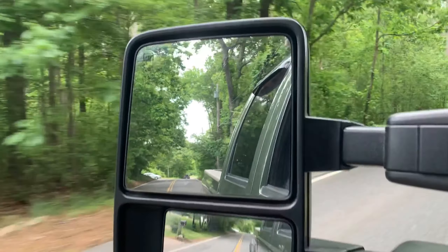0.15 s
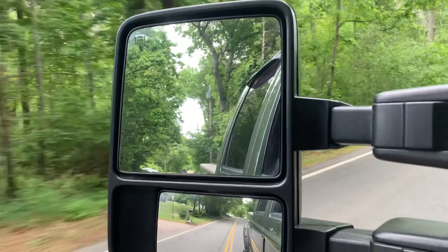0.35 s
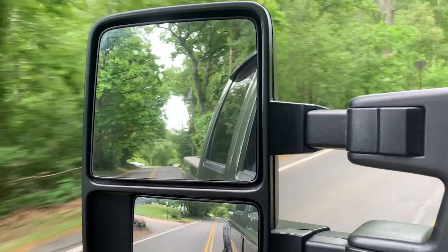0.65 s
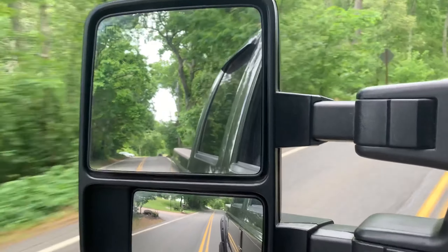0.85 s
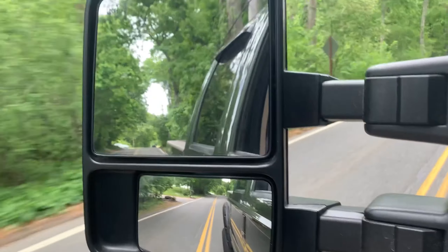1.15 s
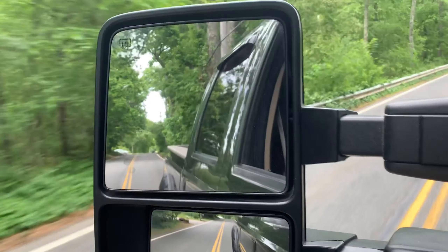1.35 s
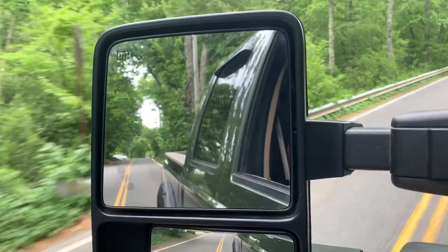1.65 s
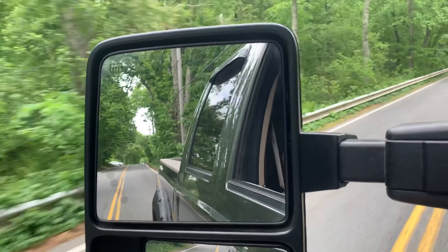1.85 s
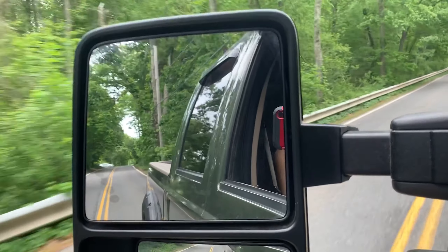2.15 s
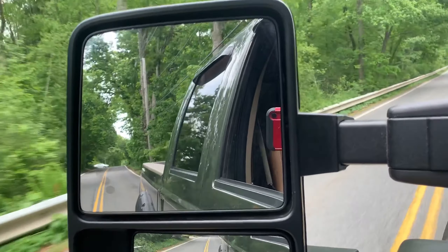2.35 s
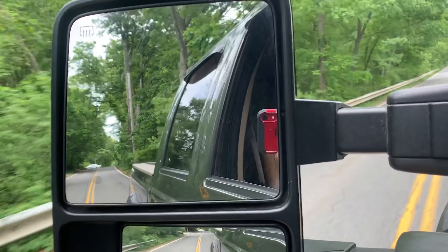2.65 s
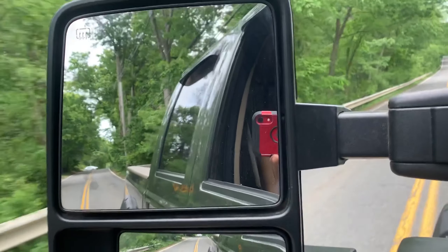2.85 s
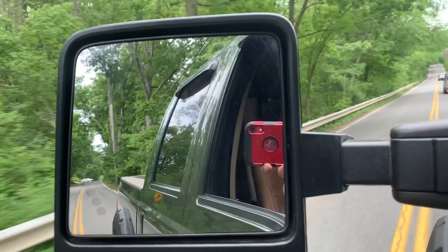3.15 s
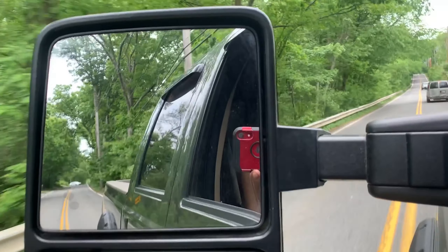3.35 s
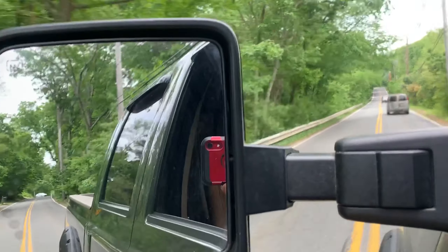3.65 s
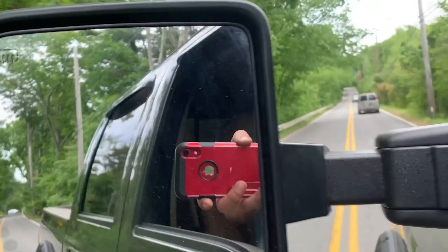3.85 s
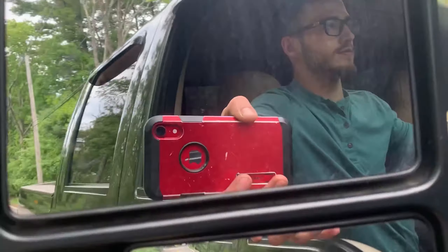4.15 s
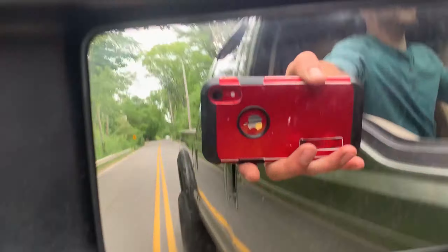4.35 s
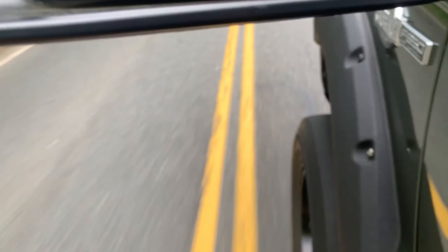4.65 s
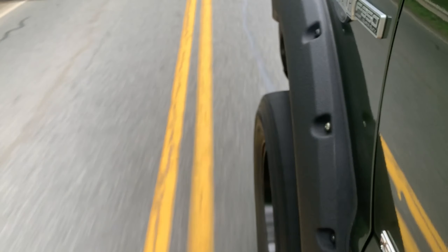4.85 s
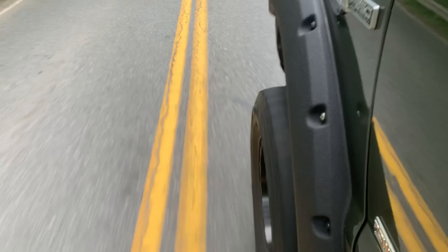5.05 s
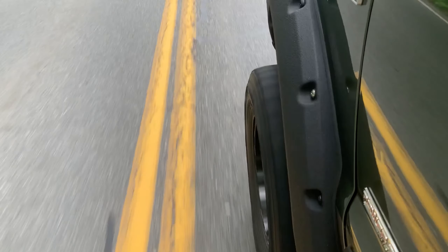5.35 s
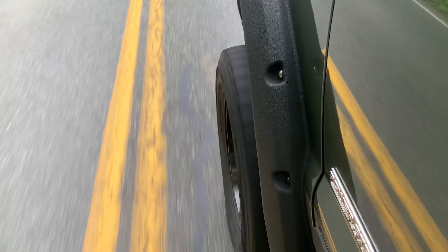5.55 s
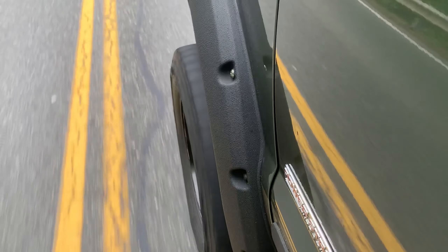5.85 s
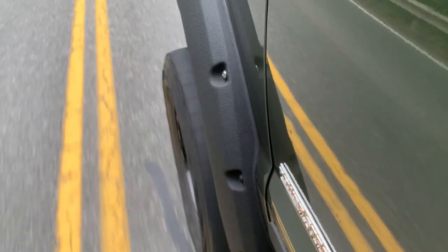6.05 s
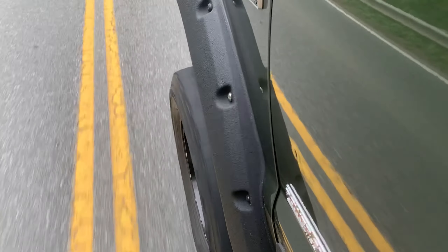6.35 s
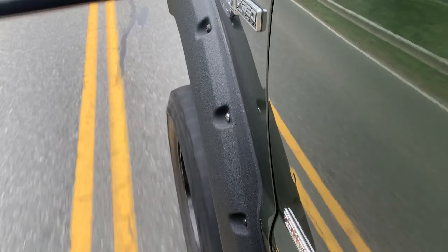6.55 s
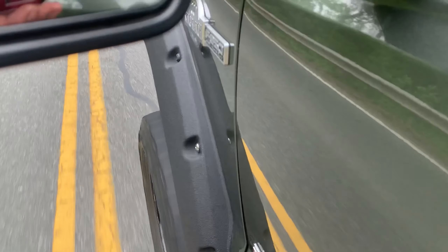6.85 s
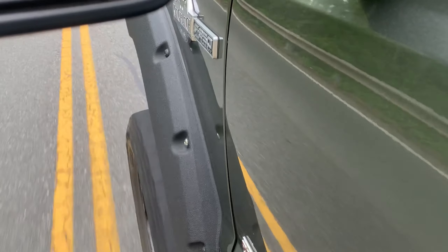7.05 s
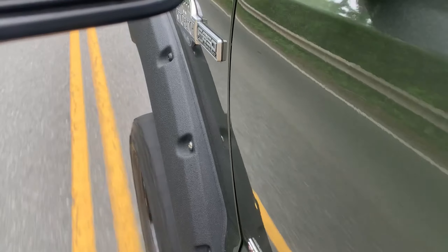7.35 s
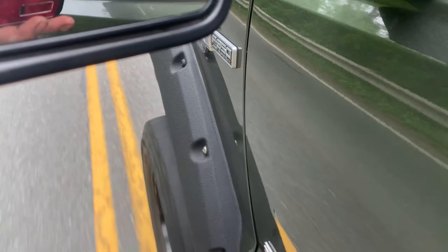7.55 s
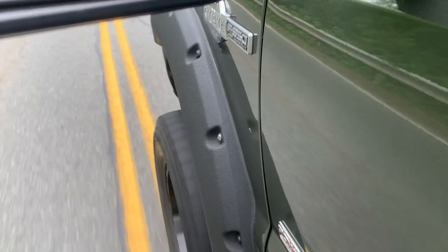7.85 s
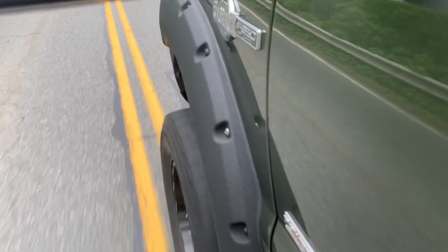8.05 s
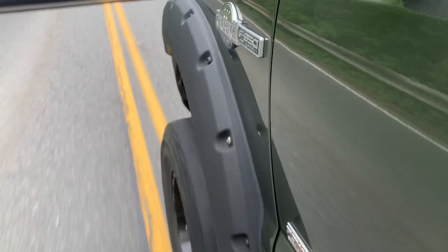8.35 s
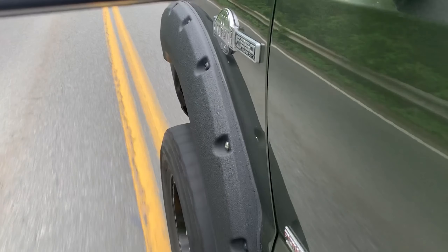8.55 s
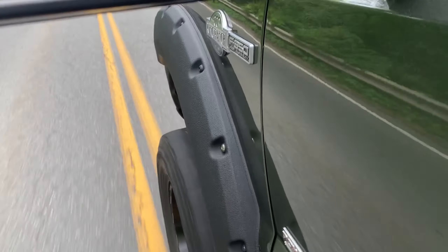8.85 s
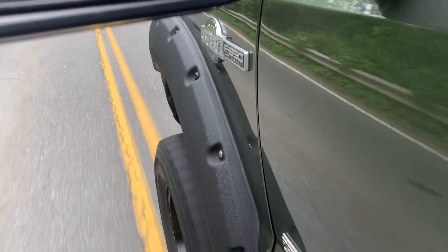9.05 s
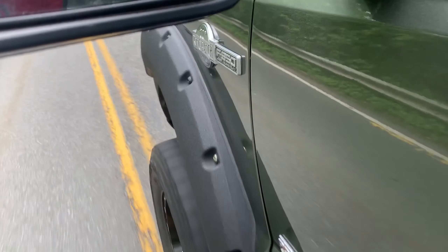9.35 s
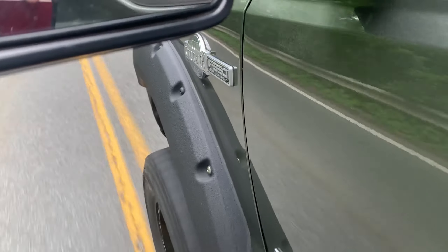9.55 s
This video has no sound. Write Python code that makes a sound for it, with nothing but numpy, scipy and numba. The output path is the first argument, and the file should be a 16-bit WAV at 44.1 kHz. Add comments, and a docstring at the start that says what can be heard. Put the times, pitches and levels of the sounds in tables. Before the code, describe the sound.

Strong wind hits a phone microphone held out of a moving truck's window, rumbling and thumping with sharp snaps and papery crackle. Beneath it, tyres roar on the road, a diesel engine drones and a faint high turbo whistle rises, then falls away. The sound is hollow at first and opens up about four seconds in with a brief hiss. The road noise then recedes while the gusts keep pounding.

```python
"""Wind thumps and rumbles on a phone held out of the window of an accelerating diesel truck.
Eddies hit the two microphone ports point-blank: large ones rumble, small ones rasp, snap and crackle.
Farther off, tyres roar on the country road, the engine drones and the turbocharger whistles.
The sound is hollow by the window frame and opens up about 4 s in, out in the airstream.
The phone keeps the bass mono and takes the treble mostly from one port, late on one side."""
import sys
import numpy as np
from scipy import signal
from scipy.fft import rfft, irfft, next_fast_len
from scipy.io import wavfile
from scipy.ndimage import uniform_filter1d
from numba import njit

SR = 44100
rng = np.random.default_rng(int(sys.argv[2]) if len(sys.argv) > 2 else 0)


def to_wav(sig):
    """Store sig (one row per channel, or 1-D mono) as 16-bit WAV at the path in sys.argv[1].

    Samples outside -1..1 are clipped; the rate is SR.
    """
    pcm = np.clip(np.atleast_2d(sig), -1, 1) * 32767
    pcm = np.round(pcm).astype(np.int16)
    wavfile.write(sys.argv[1], SR, pcm.T)  # frames by channels


N = 427769
SIZE = next_fast_len(N)
TIME_S = np.arange(N) / SR
HZ = np.maximum(np.arange(SIZE // 2 + 1) * SR / SIZE, 1)

# Tyre and engine roar at the window, in the 880-4000 Hz band: time_s, level_db
ROAR_LEVEL = [(0, -42), (.3, -41.5), (.6, -41.5), (1.08, -39), (1.54, -36.5), (2.89, -35), (3.7, -33),
              (4, -34), (4.8, -30), (6.1, -32.5), (6.9, -40), (7.67, -37.5), (8.8, -45.5), (9.7, -54)]
# Spectrum of that roar: frequency_hz, gain_db
ROAR_COLOUR = [(24, -37), (40, 1), (120, -3.5), (260, -16), (550, -22.5), (800, -15), (980, -18.5),
               (1200, -19.5), (1500, -31.5), (2050, -31.5), (2400, -31.5), (2750, -30.5), (3200, -32),
               (3450, -49), (4200, -39.5), (7000, -53), (11000, -60), (15800, -82)]
# Partials of the engine hum: pitch_hz, level_db
ENGINE_PARTIALS = [(65, -34), (157, -35), (237, -50.5), (291, -53)]
# Turbocharger: time_s, pitch_hz, rush_db, tone_db
TURBO_WHISTLE = [(0, 7660, -64, -75), (.5, 7800, -61, -66), (1, 8500, -60, -76), (1.5, 9190, -49, -52),
                 (2, 10000, -45.5, -50), (2.5, 10110, -44.5, -52), (3, 10230, -43.5, -46),
                 (3.5, 10250, -43.5, -47), (3.75, 9960, -47.5, -58), (4.05, 9350, -47, -49),
                 (4.25, 9220, -40, -49), (4.5, 9110, -65, -44.5), (5.1, 9070, -59, -40.5),
                 (5.3, 8960, -49, -48), (5.5, 8730, -49, -51), (5.8, 8200, -53, -72), (7, 8230, -61, -85)]
# Hollow knocks among the eddies: start_s, level_db, pitch_hz
WIND_KNOCKS = [(0.803, -13, 464), (0.885, -23, 305), (1.609, -28, 312), (2.011, -21, 380),
               (2.248, -20, 388), (3.283, -13, 493), (3.751, -11, 328), (4.19, -7, 600), (4.799, -6, 330),
               (5.769, -14, 500), (5.849, -14, 450), (6.463, -3, 479), (7.343, -5.5, 301), (7.405, -8, 300),
               (7.427, -8, 300), (7.601, -14, 406), (8.706, -12, 320), (8.985, -7, 415)]
# The hardest eddies bursting on a port: start_s, snap_db, thump_db, tick_db
HARD_EDDIES = [(0.076, -21, -27, -72), (0.652, -12.5, -10, -64), (0.803, -40, -28, -66),
               (0.886, -14, -19.5, -60), (1.057, -36, -19, -66), (1.123, -15, -7, -65),
               (1.154, -18, -19, -65), (1.174, -14, -21, -62), (1.21, -15, -36, -61), (1.305, -9, -11, -42),
               (1.364, -13, -18, -39), (1.442, -20, -18, -62), (1.518, -18, -22, -62),
               (1.604, -12, -20, -56), (1.664, -15, -34, -60), (1.764, -13, -18, -57),
               (1.97, -13, -34, -48), (2.121, -16, -16, -54), (2.144, -19, -28, -56),
               (2.182, -12, -23, -51), (2.261, -18, -32, -52), (2.306, -13, -19, -58),
               (2.335, -14, -26, -58), (2.367, -11, -18, -54), (2.409, -22, -15, -62),
               (2.47, -17, -15, -53), (2.518, -9, -30, -48), (2.53, -4.5, -32, -48), (2.553, -13, -24, -52),
               (2.607, -9, -9, -38), (2.629, -20, -15, -58), (2.657, -12, -18, -46), (2.708, -13, -12, -52),
               (2.762, -22, -12, -53), (3.204, -11.5, -7, -37), (3.28, -11, -10, -30),
               (3.363, -20, -5, -52), (3.749, -18, -14, -47), (3.789, -10, -22, -38), (3.812, -8, -8, -33),
               (4.079, -14, -24, -38), (4.095, -15, -24, -38), (4.149, -5, -18, -46), (4.19, -14, -25, -33),
               (4.286, 1, -4, -34), (4.413, 1, -14, -64), (4.495, -4, -18, -54), (4.799, -1, -7, -61.5),
               (5.009, -25, -9, -57), (5.235, -2, -11, -52), (5.329, -10, -10, -52), (5.375, -5, -7, -56),
               (5.468, -4, -7, -57), (5.77, -2, -11, -60), (5.853, -7, -14, -55), (6.175, -6, -24, -45),
               (6.463, -8, -7, -58), (7.078, -2.5, -8, -48), (7.125, -6.5, -25, -40), (7.163, -6, -19, -61),
               (7.223, -13, -13, -52), (7.259, -16, -8, -51), (7.367, -10, -26, -56),
               (7.426, -9.5, -13, -50), (7.539, -6, -10, -48), (7.602, -12, -14, -71),
               (7.876, -4.5, -15, -37), (8.228, -12, -18, -44), (8.345, 1, -38, -53),
               (8.544, -15, -21, -50), (8.764, -8, -12, -38), (8.784, -11, -27, -48), (8.917, -5, -20, -51),
               (8.947, 0, -14, -46), (9.005, -6, -23, -52), (9.037, -13, -26, -48), (9.087, -9, -6.5, -45),
               (9.134, -7, -4, -46), (9.188, -3, -28, -55), (9.265, -2, -23, -43), (9.338, -5, -20, -42),
               (9.494, -6, -5, -48)]
# Spectra that then shape the three parts of a burst: frequency_hz, gain_db
SNAP_COLOUR = [(250, -35), (800, 5), (1500, 3), (3000, -9.5), (4300, -9.5), (5400, -30), (9000, -42)]
THUMP_COLOUR = [(30, 39.5), (100, 44), (300, 37.5), (600, 29), (1000, 8), (3000, -27)]
TICK_COLOUR = [(3000, -24), (4500, -6), (6500, 2), (11000, 7.5), (15800, -9)]
# Wind bands, large eddies to small (rumble, flutter, flap, rasp, crackle): low_hz, high_hz
EDDY_BANDS = [(30, 130), (150, 350), (400, 900), (1500, 5000), (11500, 15500)]
# Spectrum of the turbulence: frequency_hz, gain_db
EDDY_COLOUR = [(20, -96), (43, 1), (88, 0.5), (207, -5.5), (1050, -25), (2200, -32), (4200, -41),
               (5500, -48), (7800, -46.5), (11000, -57.5), (15800, -59.5)]
# Mean wind on the ports: time_s, rumble_db, flutter_db, flap_db, rasp_db, crackle_db
MEAN_WIND = [(0, -10.5, -36, -40, -41, -70), (0.15, -20, -46, -48, -59, -82),
             (0.25, -39, -43, -52, -51, -80), (0.6, -25.5, -41, -42.5, -53, -78),
             (1.1, -23, -26, -46, -48, -68), (1.5, -12.5, -26, -49, -43.5, -69),
             (2.2, -13.5, -20, -38, -38.5, -69), (2.7, -8.5, -17, -30.5, -39, -59.5),
             (3.2, -9.5, -12.5, -20, -32, -59), (3.7, -10.5, -11, -20.5, -35, -56),
             (3.95, -11, -13.5, -17, -26.5, -67.5), (4.5, -14.5, -25.5, -29, -36, -66),
             (5, -9.5, -20, -25, -31, -62), (5.8, -16.5, -21, -24, -32, -71.5),
             (6.5, -15, -21.5, -20, -30, -68.5), (7.5, -21.5, -21.5, -26, -35.5, -84.5),
             (8.2, -9.5, -18, -26.5, -32.5, -70.5), (9, -11.5, -15, -18.5, -26.5, -65),
             (9.7, -11.5, -18, -28, -33, -67)]
# Gusts, added to the mean wind: middle_s, length_s, rumble_db, middle_bands_db, crackle_db
WIND_GUSTS = [(0.582, 0.052, 14, 1, 2), (0.665, 0.075, 11, 18, -7), (0.871, 0.14, 15.5, 4, 0),
              (1.073, 0.071, 18.5, 7.5, -7), (1.126, 0.042, 12, 12, -10), (1.261, 0.045, 17.5, 1, 0),
              (1.308, 0.046, 19, 10, 6), (1.389, 0.073, 6, 6.5, 2), (1.454, 0.094, -5, 6, -8),
              (1.604, 0.1, 10, 6, 2), (1.694, .05, 9, 3, 2), (1.81, 0.054, 10, 1.5, 0),
              (1.871, 0.055, 12, 3.5, 5), (2.013, 0.041, 0, 5, -6), (2.12, 0.17, 7, 1.5, 2),
              (2.25, 0.042, 9, 5.5, -2), (2.302, 0.034, 5, -1, 2), (2.437, 0.076, 3, -3, 0),
              (2.508, 0.1, 6, 7.5, 6), (2.554, 0.043, -8, -1, 2), (2.63, 0.084, -7, 3.5, 12),
              (2.703, 0.052, -2, -5, -8), (2.93, 0.1, 9, 0.5, 3), (3.823, 0.054, -8, 5.5, -4),
              (3.954, 0.18, 0, 2, 12), (4.09, 0.11, -1, -2.5, 12), (4.15, 0.1, -2, 4, 15),
              (4.252, 0.22, -7, 8.5, 15), (4.293, .04, -4, 2, 6), (4.505, 0.026, 14, 6.5, 11),
              (4.656, 0.11, -5, 2, 8), (4.715, 0.76, 0, 8, 2.5), (4.912, 0.085, -3, 4.5, -5),
              (5.141, 0.27, 1, 6.5, 2), (5.516, 0.21, 0.5, 4, 4), (5.644, 0.21, -2, 6.5, 2),
              (5.787, 0.047, 7, 1, 11), (6.156, 0.15, -1, 3.5, 5), (6.541, 0.039, 11.5, 2, 6),
              (6.753, 0.19, 8, 3, 15), (7.092, 0.24, 5, 5, 23), (7.262, 0.046, 1, 3.5, 27),
              (7.4, 0.42, 5, 4, 10), (7.9, 0.062, 0, 0, 16), (8.034, 0.045, -6, 4, 17),
              (8.146, 0.059, -1.5, 7, 13), (8.224, 0.097, -6, 7.5, 13), (8.396, 0.21, -4, 7, 15),
              (8.538, 0.029, 0, -1.5, 25), (8.672, 0.077, 7, -1.5, -6), (8.993, 0.23, 3.5, -2, 6.5),
              (9.078, 0.06, 6, -6.5, 15), (9.187, 0.037, -1, 5, 21), (9.246, 0.063, -1, 6.5, 17),
              (9.493, 0.12, -7, 5, 10), (9.566, 0.034, -14, 2, 15)]
# Lulls: middle_s, length_s, drop_db
WIND_LULLS = [(0.534, 0.077, 8), (0.79, 0.065, 0), (0.994, 0.21, 3.5), (1.208, 0.11, 6), (1.472, 0.042, -1),
              (1.564, .045, 10), (1.756, 0.07, 3), (1.851, 0.052, 23), (1.923, 0.045, 0), (2.05, .05, 2),
              (2.22, 0.032, 9), (2.37, 0.049, 10), (2.506, 0.045, 10), (2.67, 0.038, 2), (2.764, .045, 2),
              (3.46, 0.65, 4.5), (4.33, 0.071, 3.5), (4.468, 0.057, 2.5), (5.275, 0.14, 3),
              (5.594, 0.073, 6), (6.396, 0.21, 6), (6.614, 0.12, 8), (6.882, 0.6, 5.5), (7.166, 0.11, 4.5),
              (7.51, 0.035, 8), (7.782, 0.065, 6), (8.28, 0.097, 1.5), (8.58, 0.42, 2.5), (8.884, .08, 3.5),
              (9.196, 0.33, 7), (9.407, 0.064, 0), (9.595, 0.075, 5.5)]
# Hollow tone with the microphone by the window frame: frequency_hz, gain_db
FRAME_COLOUR = [(450, 0.5), (700, -4.5), (950, -7), (1150, -1), (1400, 0.5), (1750, -1), (2400, -4.5),
                (2950, -4), (3450, -3), (4300, -4), (5500, -1.5), (7000, -1)]
# Edge below which the phone's channels are alike: time_s, edge_hz
MONO_EDGE = [(0, 745), (1.6, 327), (3.8, 480), (4.1, 950), (4.6, 1130), (5.8, 1030), (9.7, 810)]


def undb(db):
    return 10 ** (np.asarray(db) / 20)


def unit(x):
    return x / np.sqrt(np.mean(x ** 2))


def curves(table):
    """Columns of a timed table, one value per sample."""
    time_s, *columns = np.transpose(table)
    return [np.interp(TIME_S, time_s, column) for column in columns]


def colour(points):
    """Gain per frequency bin from (frequency_hz, gain_db) points."""
    hz, db = np.transpose(points)
    return undb(np.interp(np.log(HZ), np.log(hz), db))


def band_db(gain, low_hz, high_hz):
    """Level that white noise keeps between two edges after a colour."""
    return 10 * np.log10(np.sum(gain[(HZ > low_hz) & (HZ < high_hz)] ** 2) / len(HZ))


def walk(rate):
    """Random levels held 1 / rate s and smoothed twice; spread 1."""
    hold = int(SR / rate)
    steps = np.repeat(rng.standard_normal(N // hold + 1), hold)
    return unit(uniform_filter1d(uniform_filter1d(steps, hold), hold)[:N])


@njit
def svf(x, hz, damp):
    """State-variable filter with a moving centre: band-pass and high-pass."""
    band, high = np.empty(len(x)), np.empty(len(x))
    band_state, low_state = 0., 0.
    for i in range(len(x)):
        g = np.tan(np.pi * hz[i] / SR)
        v = (band_state + g * (x[i] - low_state)) / (1 + g * (g + damp))
        band[i], high[i] = damp * v, x[i] - damp * v - low_state - g * v
        band_state, low_state = 2 * v - band_state, low_state + 2 * g * v
    return band, high


def fade(kicks, decay_s, samples=1200):
    """An exponential tail on every kick."""
    return np.convolve(kicks, np.exp(-np.arange(samples) / (decay_s * SR)))[:N]


def bumps(table):
    """Smooth rises and falls: one curve per height column of (middle_s, length_s, heights...) rows."""
    middle_s, length_s, *heights = np.transpose(table)
    t = np.arange(0, N, 64) / SR
    shape = np.cos(np.pi * np.clip((t - middle_s[:, None]) / length_s[:, None], -.5, .5)) ** 2
    return [np.interp(TIME_S, t, height @ shape) for height in heights]


def blips(rows, cycles):
    """Spectrum of a few windowed cycles for each (start_s, level_db, pitch_hz) row."""
    out = np.zeros(N + SR)
    for start_s, db, hz in rows:
        size, at = int(cycles * SR / hz), int(start_s * SR)
        out[at:at + size] += undb(db) * np.hanning(size) * np.sin(2 * np.pi * hz * np.arange(size) / SR)
    return rfft(out[:N], SIZE)


def port_noise(shared):
    """White noise at two ports, with a share of its power common to both."""
    noise = rng.standard_normal((3, N))
    return np.sqrt(shared) * noise[0] + np.sqrt(1 - shared) * noise[1:]


def lag(seconds, in_step_hz):
    """Phase turns that make the left side half a lag late and the right half a lag early."""
    return np.exp(-1j * np.pi * seconds * (HZ - in_step_hz) * np.array([[1], [-1]]))


def shelter(middle_s=3.95, move_s=0.4):
    """Microphone position: 1 while the window frame shields it, 0 out in the stream."""
    return np.clip(.5 - (TIME_S - middle_s) / move_s, 0, 1)


def road_roar():
    """Spectrum of the flickering tyre and engine roar, which reaches one port before the other."""
    shape = colour(ROAR_COLOUR)
    level_db, = curves(ROAR_LEVEL)
    roar = port_noise(shared=.45) * undb(level_db - band_db(shape, 880, 4000) + 1.33 * walk(20))
    return rfft(roar, SIZE) * shape * lag(.00041, in_step_hz=1480)


def engine_hum():
    """The diesel's low partials, each wavering in level and pitch."""
    hum = 0
    for hz, db in ENGINE_PARTIALS:
        peak = np.sqrt(2) * undb(db + walk(21))
        pitch_hz = hz * (1 + 0.00804 * walk(6))
        hum += peak * np.sin(2 * np.pi * np.cumsum(pitch_hz) / SR)
    return hum


def turbocharger():
    """A gliding whistle: a thin noisy tone inside a wider rush of air."""
    pitch_hz, rush_db, tone_db = curves(TURBO_WHISTLE)
    rush = rng.standard_normal(N)
    for damp in (0.16, 0.24, 0.38):
        rush = svf(rush, pitch_hz, damp)[0]
    tone = svf(rng.standard_normal(N), pitch_hz, 0.0039)[0]
    return unit(rush) * undb(rush_db + 1.2 * walk(30.2)) + unit(tone) * undb(tone_db + 1.4 * walk(25))


def air_jet(start_s=4.075, end_s=4.302, edge_s=0.021, centre_hz=10200, width_hz=6400):
    """Spectrum of a jet of air across the ports: a sputtering hiss that starts and stops abruptly."""
    gate = np.clip(np.minimum(TIME_S - start_s, end_s - TIME_S) / edge_s, 0, 1)
    hiss = rng.standard_normal((2, N)) * gate * undb(-36.5 + 4 * walk(400))
    return rfft(hiss, SIZE) * np.exp(-((HZ - centre_hz) / width_hz * 2) ** 4)


def knocks():
    """Spectrum of short hollow knocks, alike on both ports."""
    return blips(WIND_KNOCKS, cycles=2.9)


def spits(rasp_db, rate=260, low_hz=598, high_hz=4900, fall_db_per_octave=5.5, far_port_db=-5.5):
    """Spectrum of dense papery spits that follow the rasp's level, louder at one port."""
    when, pitch, size = rng.random((int(rate * N / SR), 3)).T
    octaves = pitch * np.log2(high_hz / low_hz)
    scatter_db = -5 * np.log(1 - .97 * size)
    level_db = rasp_db[(when * N).astype(int)] + 12 - fall_db_per_octave * octaves + scatter_db
    rows = zip(when * N / SR, level_db, low_hz * 2 ** octaves)
    return blips(rows, cycles=3.1) * undb([[0], [far_port_db]])


def eddy_pops(levels_db, stray_rate=22):
    """Spectrum of eddies bursting on the ports: a push for the thump, brief noise for snap and tick."""
    start_s, *parts_db = np.transpose(HARD_EDDIES)
    kicks = np.zeros((3, N))
    kicks[:, (start_s * SR).astype(int)] = undb(parts_db)
    # stray bursts follow the strength of the wind around them
    chance = rng.random((int(stray_rate * N / SR), 4)).T
    at = (chance[0] * N).astype(int)
    _, _, flap_db, rasp_db, crackle_db = levels_db
    stray_db = np.array([rasp_db[at] + 15.5, flap_db[at] + 6.5, crackle_db[at]])
    kicks[:, at] += undb(stray_db - np.log(1 - .95 * chance[1:]))
    snaps, pushes, ticks = kicks
    inside = shelter()  # out in the stream a snap is torn longer and its front is weaker
    snap_envelope = fade(snaps * inside, 0.0021) + undb(-3) * fade(snaps * (1 - inside), 0.0047)
    front = (2.1 + 2.4 * inside) * snaps  # reaches both ports alike
    snap = snap_envelope * rng.standard_normal((2, N)) + front
    tick = fade(ticks, 0.002) * rng.standard_normal((2, N))
    ragged_wake = undb(-28.5) * fade(pushes, 0.011, samples=3000) * rng.standard_normal(N)
    parts = (snap, SNAP_COLOUR), (pushes + ragged_wake, THUMP_COLOUR), (tick, TICK_COLOUR)
    return sum(rfft(part, SIZE) * colour(points) for part, points in parts)


def small_eddies(rate, scatter_db, length_s):
    """Envelope of passing eddies: short bumps at random moments, rarely large."""
    when, size = rng.random((int(rate * N / SR), 2)).T
    kicks = np.zeros(N)
    np.add.at(kicks, (when * N).astype(int), undb(-scatter_db * np.log(1 - .97 * size)))
    return np.convolve(kicks, np.hanning(int(length_s * SR)), "same")


def wind_levels():
    """Level in dB of each wind band: the mean, moved by gusts and lulls."""
    rumble, flutter, flap, rasp, crackle = curves(MEAN_WIND)
    low_gust, middle_gust, top_gust = bumps(WIND_GUSTS)
    lull, = bumps(WIND_LULLS)
    swing = middle_gust - lull
    heave = walk(9.7)
    return [rumble + low_gust - 0.44 * lull + heave, flutter + swing, flap + swing,
            rasp + 0.96 * swing, crackle + top_gust - 0.97 * lull]


def wind_buffeting(levels_db):
    """Spectrum of turbulence right on the ports: octaves of mostly unrelated noise under shared gusts."""
    shape = colour(EDDY_COLOUR)
    trims_db = [db - band_db(shape, *band) for db, band in zip(levels_db, EDDY_BANDS)]
    band_octaves = np.log2([np.sqrt(low * high) for low, high in EDDY_BANDS])
    gust = 0.84 * walk(13) + 0.75 * walk(45)
    flaps = small_eddies(rate=28, scatter_db=4.5, length_s=0.029)
    tears = small_eddies(rate=160, scatter_db=3.5, length_s=0.0089)
    ticks = small_eddies(rate=120, scatter_db=5.5, length_s=0.0012)
    noise = port_noise(shared=0.25)
    spectrum = 0
    for octave in np.arange(5, 15):  # centres at 2 ** octave Hz
        place = np.interp(octave, band_octaves, np.arange(5))
        below = min(int(place), 3)
        gain_db = trims_db[below] + (place - below) * (trims_db[below + 1] - trims_db[below])
        rough = np.clip((octave - 4.5) / 6.25, 0, 1.2)  # small eddies are the burstier
        fine = np.clip((octave - 12) / 1.7, 0, 1)  # the finest arrive as thin ticks
        lumpy = 0.31 * np.exp(-((octave - 8) / 5.3) ** 2)  # middling ones come as separate flaps
        crackle = (1 - 0.19 * fine) * tears + 10.7 * fine * ticks
        flicker_db = rough * (gust + 1.1 * walk(30) + 1.4 * walk(110)) + 0.98 * walk(22)
        texture = unit(undb(flicker_db) * (1 + 0.29 * rough ** 2 * crackle + lumpy * flaps))
        passband = np.cos(np.pi / 2 * np.clip(np.log2(HZ) - octave, -1, 1)) ** 2
        spectrum += passband * rfft(noise * texture * undb(gain_db), SIZE)
    return spectrum * shape


def scene():
    """Pressure at the two microphone ports, hollow until the phone is out in the stream."""
    levels_db = wind_levels()
    # ten all-pass stages at 170 Hz in the microphone path: a burst's bass trails its treble
    smear = ((1 - 1j * HZ / 170) / (1 + 1j * HZ / 170)) ** 10
    wind = (wind_buffeting(levels_db) + eddy_pops(levels_db)) * smear
    truck = road_roar() + rfft(engine_hum() + turbocharger(), SIZE)
    air = truck + wind + knocks() + spits(rasp_db=levels_db[3]) + air_jet()
    by_frame = irfft(air * colour(FRAME_COLOUR), SIZE)[:, :N]
    in_stream = irfft(air, SIZE)[:, :N]
    inside = shelter()
    return inside * by_frame + (1 - inside) * in_stream


def record(dry, drive=1.3, shelf_hz=7880, shelf_db=7, top_hz=15800):
    """The phone: rounded peaks, mono bass, lifted treble mostly from one port, cut top."""
    mid = np.tanh(drive * (dry[0] + dry[1]) / 2) / drive
    side = np.tanh(drive * (dry[0] - dry[1]) / 2) / drive
    edge_hz, = curves(MONO_EDGE)
    for _ in range(6):  # a steep high-pass on the side signal leaves the bass mono
        side = svf(side, 0.96 * edge_hz, 1.17)[1]
    ports = rfft([mid + side, mid - side], SIZE)
    second_port = 1j * undb(-13) * ports[1] * np.array([[1], [-1]])
    treble = (ports[0] + second_port) * lag(.00021, in_step_hz=5960)
    crossover = np.clip((HZ - 5600) / 1500, 0, 1)
    lift = undb(shelf_db * np.clip((HZ - shelf_hz) / 100, 0, 1))
    stereo = irfft((ports * np.sqrt(1 - crossover ** 2) + treble * crossover) * lift, SIZE)[:, :N]
    over = np.maximum(np.abs(stereo) - .6, 0)  # the loudest peaks are squeezed once more
    stereo -= np.sign(stereo) * (over - .22 * np.tanh(over / .22))
    stereo = signal.sosfilt(signal.butter(2, 15, "high", fs=SR, output="sos"), stereo)
    return signal.sosfilt(signal.ellip(8, .2, 70, top_hz, fs=SR, output="sos"), stereo)


dry = scene()
out = record(dry)
to_wav(out)
```